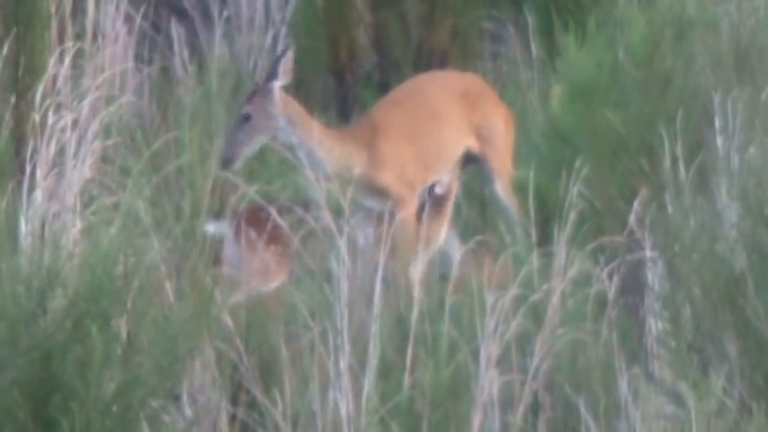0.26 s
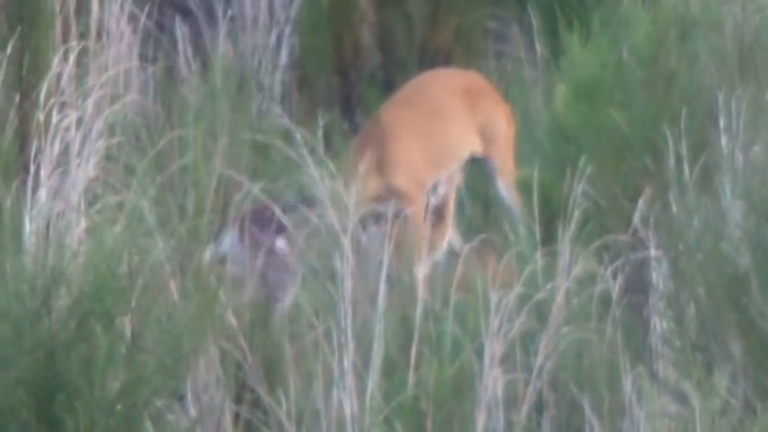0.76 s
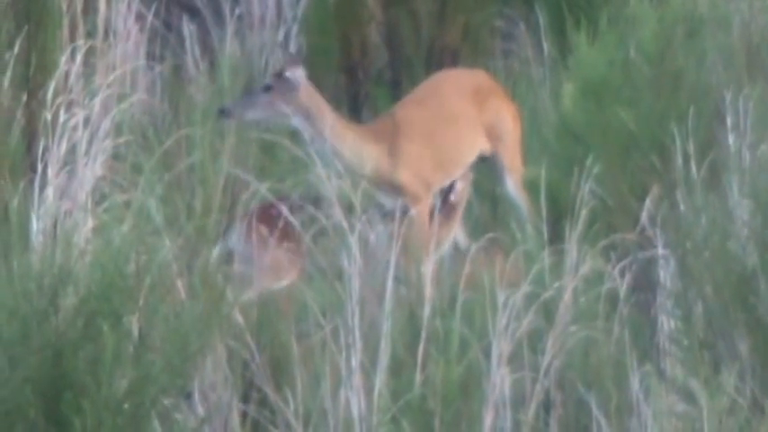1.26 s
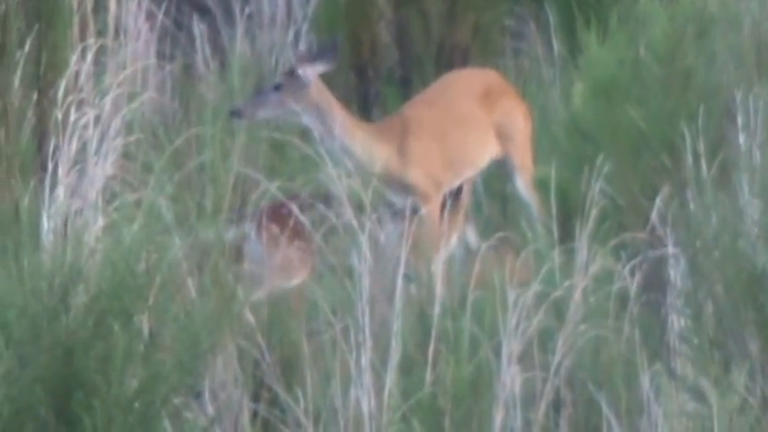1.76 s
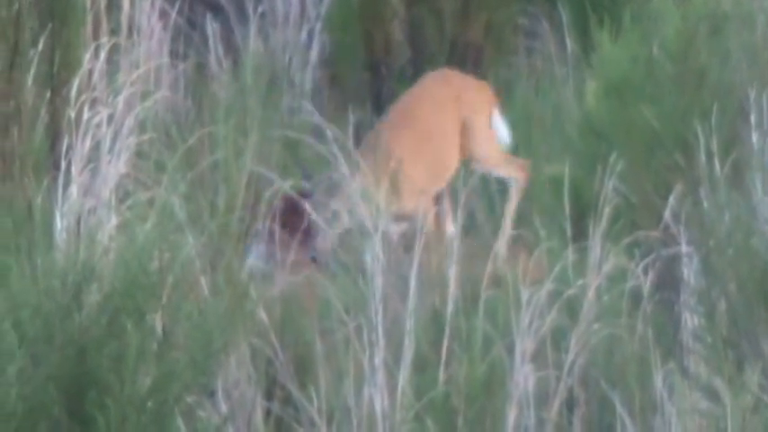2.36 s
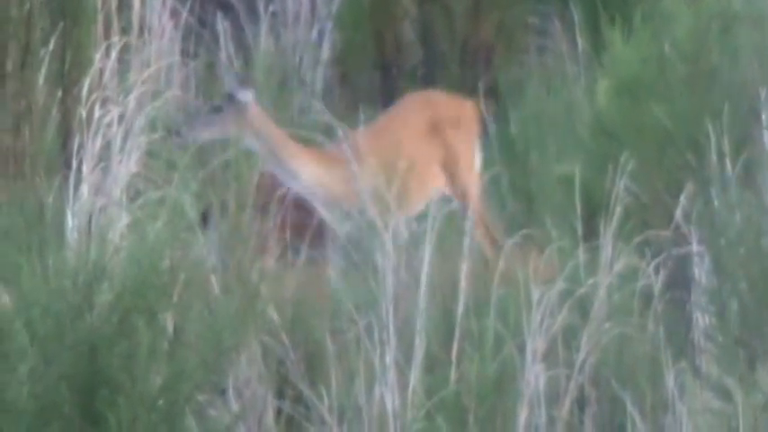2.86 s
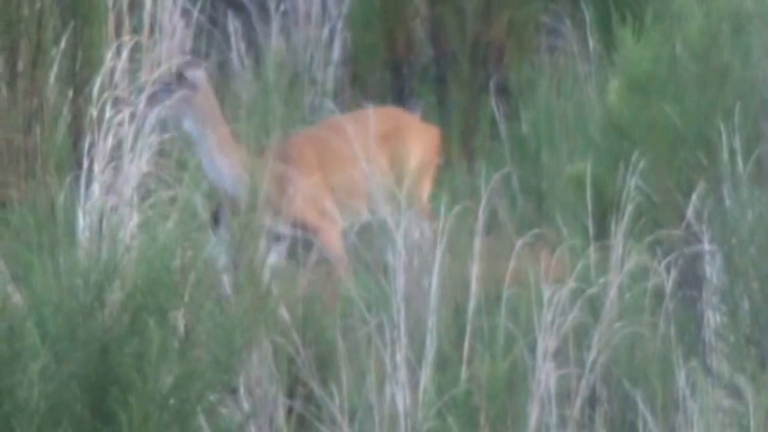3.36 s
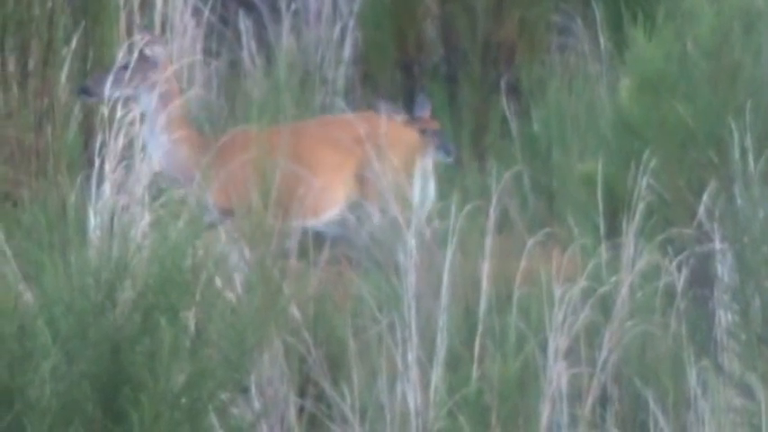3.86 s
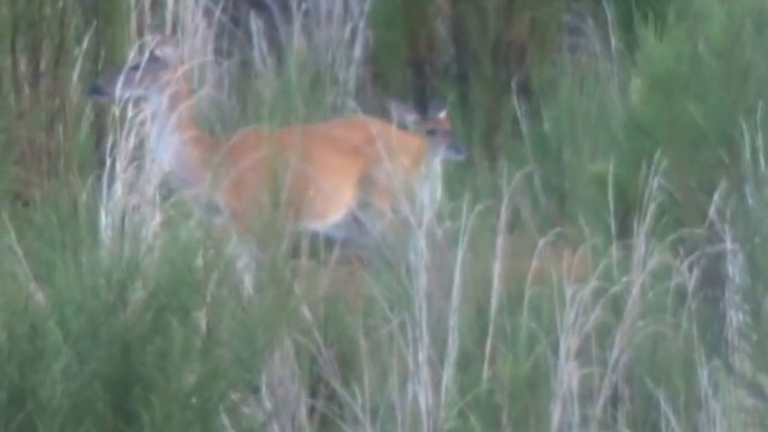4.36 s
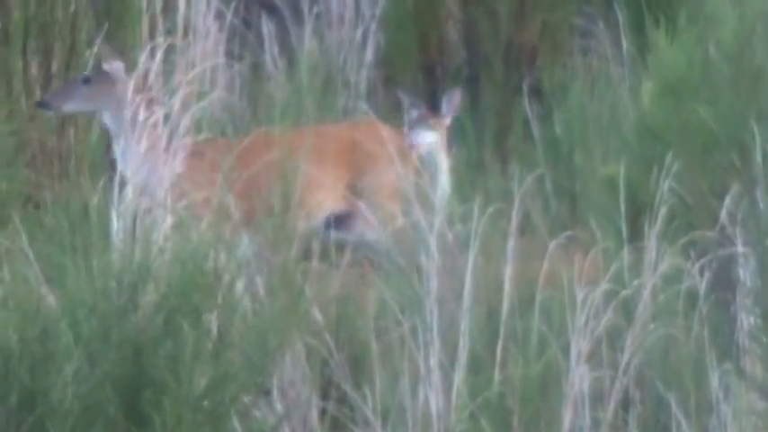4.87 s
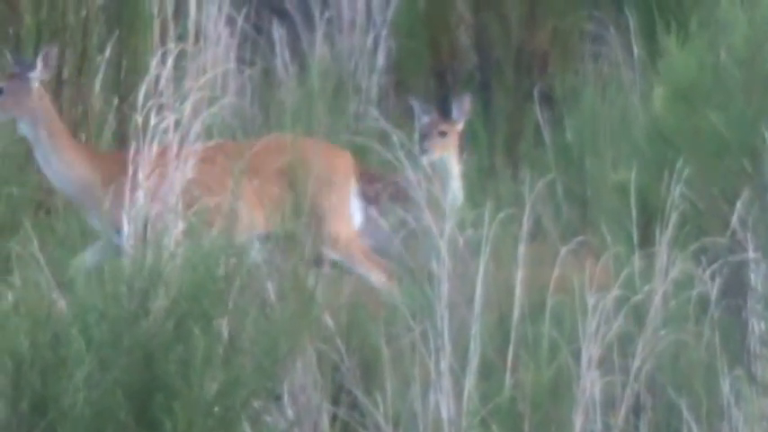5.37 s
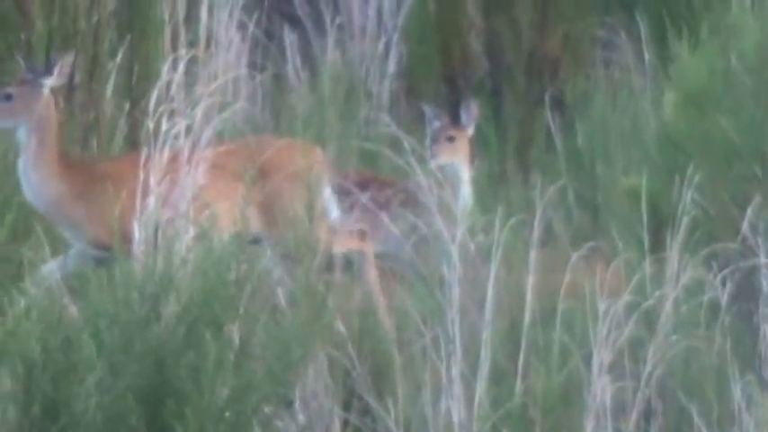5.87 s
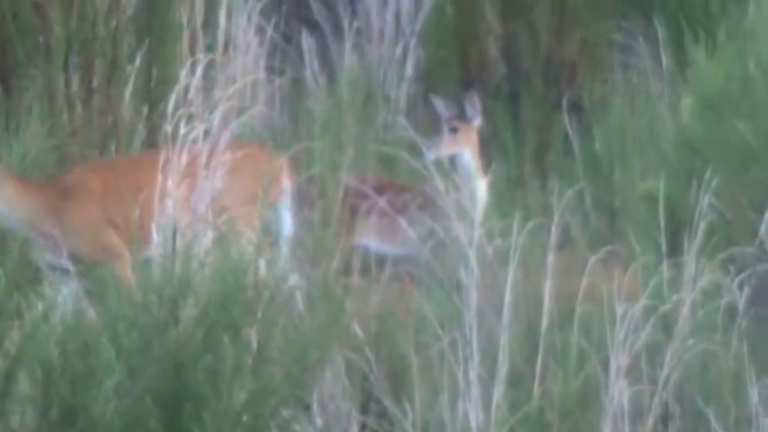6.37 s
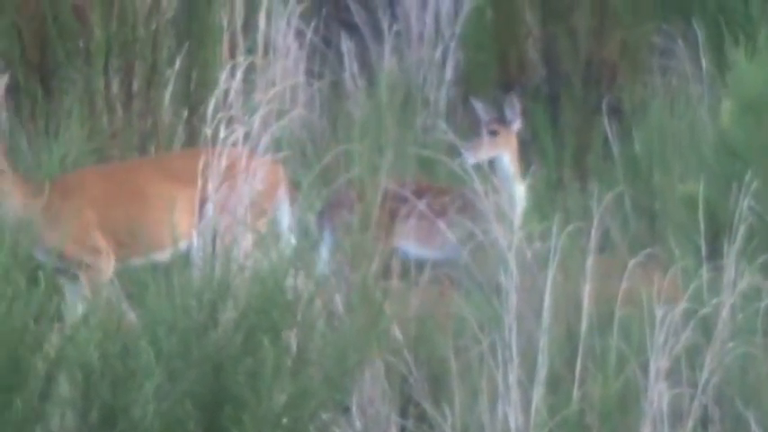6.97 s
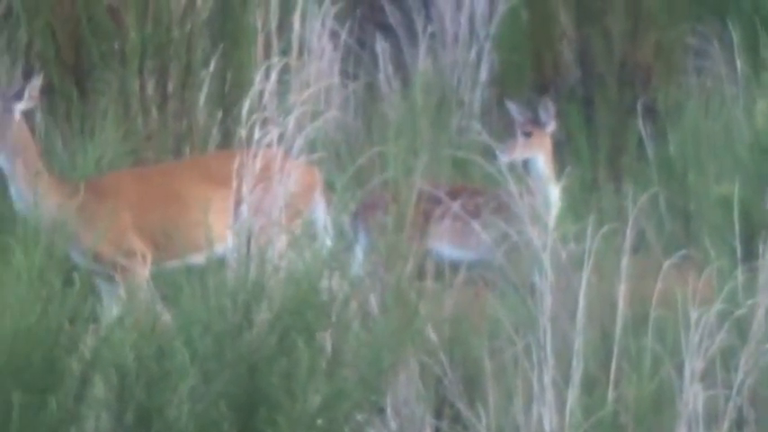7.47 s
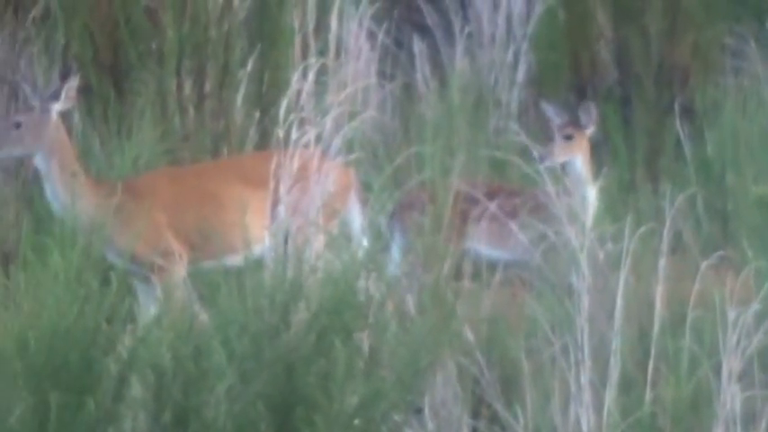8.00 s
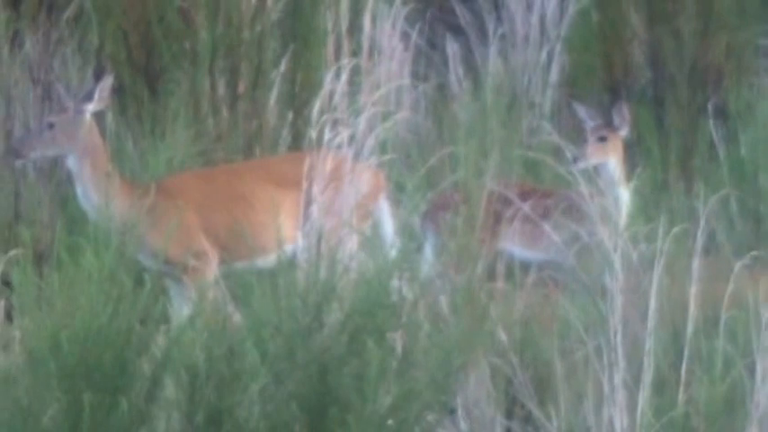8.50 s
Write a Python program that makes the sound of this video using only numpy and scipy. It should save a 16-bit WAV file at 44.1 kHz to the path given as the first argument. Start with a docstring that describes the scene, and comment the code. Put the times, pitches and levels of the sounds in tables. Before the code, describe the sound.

Insects drone high and steady over an open field while crows caw far off, with dull handling bumps and faint lens motor whirs close by.

```python
"""Insects drone high and steady over a field: shaped noise, pulsed by their wing strokes.
Crows caw far off as throbbing harmonics; a cricket and a small bird sound short tones that the trees return.
Air and traffic are filtered noise. A deer steps through dry grass in two crackling swishes of noise.
The handheld camera adds bumps, grip rumble and a knock; its lens motor clicks, whirs in steps and whines.
The camera's faint line-scan whistle lies on top."""
import sys
import numpy as np
from scipy import signal
from scipy.fft import rfft, irfft, next_fast_len
from scipy.io import wavfile

SR = 44100
rng = np.random.default_rng(int(sys.argv[2]) if len(sys.argv) > 2 else 0)


def dump(signal):
    """Clip the signal to [-1, 1] and save it as 16-bit WAV at the path in sys.argv[1]."""
    limited = np.clip(np.atleast_2d(signal).T, -1, 1)
    pcm = np.round(limited * 32767).astype(np.int16)
    wavfile.write(sys.argv[1], SR, pcm)


N = 385434
TIME = np.arange(N) / SR

# Colours give only the shape of a spectrum: their noise is scaled to rms 1.
# colour of the lower insect chorus: (frequency [Hz], relative level [dB per Hz])
LOW_CHORUS_COLOUR = [(6200, -34), (6600, -22), (7000, -11), (7350, -6), (7600, -1.5), (7800, 0), (7980, -2),
                     (8250, -5.5), (8440, -3.5), (8650, -11), (9200, -24)]
# colour of the higher insect chorus: (frequency [Hz], relative level [dB per Hz])
HIGH_CHORUS_COLOUR = [(8300, -28), (8700, -15), (9050, -8.5), (9400, -4.5), (9700, -.5), (10170, .5),
                      (10310, -4), (10400, -2), (10700, -10), (10800, -6.5), (10920, -12), (11020, -23),
                      (11400, -40)]
# wing resonance of the nearest insect: (frequency [Hz], relative level [dB per Hz])
NEAR_SINGER_COLOUR = [(7200, -24), (7600, -9), (7780, 0), (7960, -1), (8150, -11), (8500, -26)]
# colour of open air and microphone hiss: (frequency [Hz], relative level [dB per Hz])
AIR_COLOUR = [(20, 1), (70, -11), (130, -4), (200, -1.5), (330, -4.5), (470, -4), (650, -5), (1050, -8.5),
              (1700, -13), (2600, -15), (4400, -15), (5700, -17.5), (11500, -23), (15700, -24)]
# how alike the two microphone ports hear noise: (frequency [Hz], left-right likeness [-1 to 1])
PORT_LIKENESS = [(60, 0.84), (300, 0.98), (700, 0.36), (1400, 0.068), (3000, 0.32), (6000, 0.11),
                 (7500, 0.57), (10500, 0.75), (11500, 0.93), (16000, .98)]
# how far the left port leads the right: (frequency [Hz], phase lead [rad])
PORT_LEAD = [(60, 0), (700, -.3), (1400, .5), (2200, 2.6), (3600, 4), (4400, 6), (7400, 7.1), (10000, 6.4),
             (11300, 6.28)]
# colour of the distant traffic hum: (frequency [Hz], relative level [dB per Hz])
TRAFFIC_COLOUR = [(100, -31), (140, -7.5), (175, -3), (195, 2.5), (225, -14), (265, -3.5), (330, -30)]
# far vehicles passing: (start [s], end [s], level of the added hum [dB])
VEHICLE_PASSES = [(2.5, 3.35, -63), (5.1, 6.45, -64.5), (6.8, 7.45, -69.5)]
PASS_RISE_S, PASS_FALL_S = 0.14, 0.12
# colour of the grip's rumble: (frequency [Hz], relative level [dB per Hz])
RUMBLE_COLOUR = [(12, -12), (30, -0.5), (55, 1), (100, -6), (170, -15), (300, -30.5), (700, -74)]
# shifts of the hand on the camera: (start [s], end [s], level before trim [dB])
HAND_SHIFTS = [(.17, .62, -46), (.7, .84, -42), (.98, 1.32, -43), (1.47, 1.51, -43), (1.62, 1.86, -42.5),
               (1.94, 2.09, -47), (2.22, 2.6, -53), (2.93, 3.07, -56), (3.29, 3.44, -55),
               (3.99, 4.1, -47.5), (4.66, 4.72, -51), (8.3, 8.4, -60.5)]
SHIFT_RISE_S, SHIFT_FALL_S = 0.019, 0.026
# bumps on the camera body: (centre time [s], level before trim [dB], pitch [Hz])
BODY_BUMPS = [(.225, -27.5, 104), (.28, -25, 106), (.3, -28.5, 55.5), (0.425, -36.5, 105), (.523, -29, 81),
              (.78, -35, 96), (.838, -28.5, 95), (1.05, -23.5, 122), (1.071, -28, 54.7),
              (1.118, -25.5, 156), (1.149, -31, 64.6), (1.218, -26.5, 129), (1.238, -36, 77.6),
              (1.617, -37.5, 68.4), (1.837, -29.5, 88.5), (1.984, -36, 94), (2.045, -32, 97),
              (2.083, -28.5, 85), (3.301, -41, 52), (3.342, -42, 60), (4.067, -40, 84), (8.35, -50.5, 52)]
# runs of the lens motor: (start [s], end [s], level of the whir's drive [dB])
MOTOR_RUNS = [(1.001, 1.902, -65), (2.47, 3.437, -65.5), (5.089, 6.54, -67), (8.46, 8.9, -66)]
# colour of the lens barrel: (frequency [Hz], relative level [dB per Hz])
BARREL_COLOUR = [(1200, -13), (2050, -2), (2380, 7), (2650, -10.5), (3300, 5), (3700, -24), (4500, 6),
                 (5300, -18), (6200, 1.5), (8000, -48)]
# colour of the motor's tick: (frequency [Hz], relative level [dB per Hz])
TICK_COLOUR = [(3000, -20), (3900, -3), (4400, 0), (4800, -4), (5600, -18)]
# thin tones of the motor's whine: (pitch [Hz], rms level [dB])
WHINE_TONES = [(4640, -78), (4860, -78), (5020, -82), (5150, -76), (5460, -81)]
WHINE_START_S, WHINE_END_S = 6.9, 8.1
# pictures a second, which pace the motor's steps
FIELD_HZ = 59.94
# far bird's rising whistle: (start [s], length [s], first pitch [Hz], last pitch [Hz])
BIRD_WHISTLE = (.78, .39, 3020, 3660)
# clear caws: (time of the arch's top [s], top pitch [Hz], length [s], level before trim [dB],
# pitch drop at the ends [share])
CLEAR_CAWS = [(0.854, 736, .14, -55, 0.22), (1.881, 722, .13, -54, 0.22), (2.0, 746, 0.099, -64.5, 0.089),
              (2.298, 750, 0.11, -63.5, 0.14), (2.597, 765, .085, -58.5, 0.16),
              (3.06, 694, 0.12, -65, 0.08), (3.605, 735, 0.12, -64, 0.2), (3.75, 665, .14, -65, .14),
              (4.052, 752, 0.12, -58.5, 0.24), (4.258, 692, 0.12, -63.5, .18),
              (5.191, 638, 0.12, -52.5, 0.09), (5.819, 684, 0.14, -52, 0.16),
              (6.311, 668, .135, -52.5, 0.124), (6.822, 668, 0.14, -50.5, 0.15),
              (7.161, 669, 0.12, -53, 0.21), (7.563, 693, .09, -63, .08), (7.87, 657, .12, -55.5, .23),
              (8.24, 658, .13, -56.5, .23)]
CAW_RISE = .38  # share of its length for which a caw climbs
# hoarse sinking rasps: (start [s], length [s], first pitch [Hz], level before trim [dB])
HOARSE_RASPS = [(3.108, 0.3, 860, -64), (3.822, 0.13, 880, -64.5), (4.336, .18, 820, -61.5),
                (5.251, 0.33, 870, -61), (5.91, .12, 850, -62.5), (6.868, .18, 900, -62.5)]
RASP_SINK, RASP_ROUGH = .14, 0.906  # share by which the pitch sinks; roughness (0-1)
# a crow's throat as heard across the field: (frequency [Hz], relative level [dB])
CROW_THROAT = [(500, -41), (660, -16), (735, -6.5), (1000, -36), (1200, -5), (1320, 1.5), (1480, 0.5),
               (1650, -3.5), (1950, -14), (2200, -23), (3000, -38)]
# the crows grow excited between these times (s); each voice is (roughness 0-1, brightness dB)
EXCITED_S, CALM, EXCITED = (5, 7.2), (.17, -6.5), (0.47, -0.89)
# clicks that start and stop a run: (level before trim [dB], ring pitch [Hz])
START_CLICK = (-45, 2240)
STOP_CLICK = (-45, 1990)
# colour of a click's snap: (frequency [Hz], relative level [dB per Hz])
SNAP_COLOUR = [(1400, -13), (3400, -10), (4600, 10.5), (5300, 5), (6300, 11), (9000, -31), (14000, -24)]
# chirps of one far cricket: (start [s], level before stroke trim [dB])
CRICKET_CHIRPS = [(2.62, -70), (3.57, -76), (4.085, -73), (4.675, -72), (5.19, -67), (5.685, -68),
                  (6.2, -67)]
# three wing strokes make a chirp; STROKE_DB trims each of them
CRICKET_HZ, STROKE_GAP_S, STROKE_S, STROKE_DB = 4300, .054, 0.025, (-3, 5, 2)
# swishes of dry grass: (peak time [s], level before crackle [dB], rise [s], decay [s])
GRASS_SWISHES = [(2.755, -52, .04, .03), (3.05, -51.5, 0.042, 0.12)]
# colour of dry grass: (frequency [Hz], relative level [dB per Hz])
GRASS_COLOUR = [(200, -3), (700, -3), (1500, 0), (2800, 2), (4200, -2), (6200, -6), (9000, -10),
                (14000, -25)]
# a light knock on the camera: (time [s], starting level [dB], decay [s])
LIGHT_KNOCK = (7.202, -47.5, 0.0078)
# colour of the knock: (frequency [Hz], relative level [dB per Hz])
KNOCK_NOISE_COLOUR = [(150, -10), (450, 0), (1150, -1), (1700, -9), (4000, -13), (8000, -30)]


def gain_of(db):
    """Decibels to amplitude."""
    return 10 ** (np.asarray(db) / 20)


def evened(x):
    """Scales to rms 1."""
    return x / np.sqrt(np.mean(abs(x) ** 2) + 1e-20)


def read(points, hz):
    """Reads a frequency table joined by straight lines over log frequency."""
    f, value = np.transpose(points)
    return np.interp(np.log(hz + 1), np.log(f + 1), value)


def add(mix, s, sound):
    """Mixes a sound in from time s."""
    part = mix[max(round(s * SR), 0):][:len(sound)]
    part += sound[:len(part)]


def wander(rate, size=N):
    """Random drift of rms 1 that heads for a new value rate times a second."""
    knots = rng.standard_normal(8192)
    return evened(np.interp(np.arange(size) / SR * rate, np.arange(len(knots)), knots))


def noise(colour):
    """Stereo noise of rms 1 with the given spectrum, as the two ports pick it up."""
    size = next_fast_len(N)
    hz = np.fft.rfftfreq(size, 1 / SR)
    left, other = rfft(rng.standard_normal((2, size)))
    same = np.clip(read(PORT_LIKENESS, hz), -1, 1)
    right = same * left + np.sqrt(1 - same ** 2) * other
    pair = np.array([left, right * np.exp(-1j * read(PORT_LEAD, hz))])
    inside = (hz > colour[0][0]) & (hz < colour[-1][0])
    return evened(irfft(pair * gain_of(read(colour, hz)) * inside, size)[:, :N])


def swells(rows, rise_s, fall_s):
    """Amplitude that grows into each (start, end, dB) row, holds and dies away."""
    total = np.zeros(N)
    for start, end, db in rows:
        slope = np.minimum((TIME - start) / rise_s, (end - TIME) / fall_s)
        total += gain_of(db) * np.exp(np.minimum(slope, 0))
    return total


def field_echo(x, t60=1.0):
    """Sparse, scattered returns from the trees, different at each port, sink by 60 dB in t60 seconds."""
    t = TIME[:SR]
    hits = rng.random((2, SR)) < .05
    taps = rng.standard_normal((2, SR)) * hits * gain_of(-60 * t / t60)
    return signal.fftconvolve(x[None], evened(taps) / np.sqrt(SR), axes=1)[:, :N]


def reflected(x, echo_db, count=14):
    """Ground and stems return a sound within a few hundredths of a second, rippling its spectrum."""
    out = x.copy()
    for delay, sign in zip(rng.uniform(.002, .02, count), rng.choice([-1, 1], count)):
        out += sign * gain_of(echo_db) / np.sqrt(count) * np.roll(x, round(delay * SR), axis=-1)
    return evened(out)


def strokes(rate_hz, jitter, length, steady):
    """Envelope of repeated strokes, each swelling for a share of the cycle, over a steady part."""
    turns = np.cumsum(rate_hz * (1 + jitter * wander(3.6))) / SR
    return evened(steady + np.exp(-(2 * (turns % 1 - .5) / length) ** 2))


def insects(low_db=-49.0, high_db=-44.0, near_db=-53.5, flutter_db=0.23, stems_db=-12):
    """Two choruses scrape their wings; the nearest insect pulses with a strong and a weak stroke in turn."""
    low = strokes(77, .03, .4, 2.2) * gain_of(low_db + flutter_db * wander(40))
    low = low * reflected(noise(LOW_CHORUS_COLOUR), stems_db)
    high = strokes(67.5, .003, .3, 4.5) * gain_of(high_db + flutter_db * wander(40))
    high = high * reflected(noise(HIGH_CHORUS_COLOUR), stems_db)
    beat = 2 * np.pi * 27.3 * TIME + .12 * wander(3)  # two strokes a cycle
    pulses = evened((.15 + np.cos(beat) ** 4) * (1 + .18 * np.cos(beat)))
    near = pulses * gain_of(near_db) * noise(NEAR_SINGER_COLOUR)
    # left and right trims in dB
    return (low + near) * gain_of([[.8], [-.8]]) + high * gain_of([[-.3], [.3]])


def air(air_db=-54.5, roar_db=-9, waver_db=1.0, fade_db_per_s=0.12):
    """The soft roar of open country swells with each far vehicle; the microphone's hiss lies on top."""
    passing = swells(VEHICLE_PASSES, PASS_RISE_S, PASS_FALL_S)
    swell = 1 + gain_of(roar_db) * (passing / passing.max()) ** 2
    swell = swell * gain_of(waver_db * wander(8) - fade_db_per_s * TIME)
    wash = noise(AIR_COLOUR)
    roar = signal.sosfiltfilt(signal.butter(2, 1500, fs=SR, output="sos"), wash)
    return gain_of(air_db) * (wash + roar * (swell - 1))  # only the low part moves


def traffic(steady_db=-69):
    """Far engines and tyres, of which only a dull hum arrives."""
    level = gain_of(steady_db) + swells(VEHICLE_PASSES, PASS_RISE_S, PASS_FALL_S)
    return level * noise(TRAFFIC_COLOUR)


def grip_rumble(rest_db=-77, tremor_db=5, uneven_db=2):
    """A hand that rests or shifts on the body rubs out a low, uneven rumble."""
    shifting = swells(HAND_SHIFTS, SHIFT_RISE_S, SHIFT_FALL_S) * gain_of(uneven_db * wander(25) - 2.0)
    resting = gain_of(rest_db + tremor_db * wander(9))
    return (shifting + resting) * noise(RUMBLE_COLOUR) * gain_of([[-.5], [.5]])


def lens_motor(creep_db=-71, tock_db=12, tock_hz=2330, tick_db=10):
    """The motor steps once a picture; every fourth step tocks in the barrel and the next one ticks."""
    running = gain_of(creep_db) * (TIME < MOTOR_RUNS[0][0])  # it creeps quietly before the first run
    for start, end, db in MOTOR_RUNS:
        running = running + gain_of(db) * (TIME > start) * (TIME < end)
    step = (TIME - .001) * FIELD_HZ
    # each step dies away with a 4 ms time constant
    every, tick_step, tock_step = (np.exp(-since / FIELD_HZ / .004)
                                   for since in (step % 1, step % 4, (step + 1) % 4))
    whir = evened(1.2 + every) * noise(BARREL_COLOUR) * gain_of([[-1], [1]])
    tick = gain_of(tick_db) * tick_step * noise(TICK_COLOUR)
    turn = 2 * np.pi * np.cumsum(tock_hz * (1 + 0.028 * wander(200))) / SR
    # the tock takes half the ports' phase lead
    tock = gain_of(tock_db) * tock_step * np.sin([turn, turn - read(PORT_LEAD, tock_hz) / 2])
    return running * (whir + tick + tock)


def body_bumps(cycles=0.52, bump_db=1.1, rock_s=.00085):
    """A bump makes the camera body swing for a dull low cycle or two."""
    out, t = np.zeros((2, N)), np.arange(-SR // 20, SR // 20) / SR
    lags = rock_s * rng.normal(1, .4, len(BODY_BUMPS))
    for (s, db, hz), lag in zip(BODY_BUMPS, lags):
        bump = -gain_of(db + bump_db) * np.exp(-(t * hz / cycles) ** 2) * np.sin(2 * np.pi * hz * t)
        for port, side in enumerate([1, -1]):  # the body rocks, so the two ports move out of step
            add(out[port], s + t[0] + side * lag, bump)
    return out * gain_of([[-.5], [.5]])


def songbird(whistle_db=-69.5, echo_db=-6, fading_db=2.0):
    """One thin upward slur from the trees that levels off, fading in and out on the way."""
    s, length, first_hz, last_hz = BIRD_WHISTLE
    u = np.arange(0, length, 1 / SR) / length
    hz = last_hz + (first_hz - last_hz) * abs(1 - u) ** 1.3
    level = gain_of(whistle_db + fading_db * wander(45, size=len(u))) * abs(np.sin(np.pi * u)) ** 0.27
    tone = np.zeros(N)
    add(tone, s, level * np.sin(2 * np.pi * np.cumsum(hz) / SR))
    return tone + gain_of(echo_db) * field_echo(tone)


def crow_voice(hz, rough, bright_db, jitter=0.073, throb_hz=58):
    """A jittering, throbbing pitch carries its harmonics through the throat's resonance."""
    t = np.arange(len(hz)) / SR
    hz = hz * (1 + jitter * rough * wander(249.7, size=len(t)))
    phase = 2 * np.pi * np.cumsum(hz) / SR
    voice = np.zeros(len(t))
    for k in range(1, 5):
        level_db = read(CROW_THROAT, k * hz) + bright_db * (k > 2)  # brightness trims the upper two
        voice += gain_of(level_db) * np.sin(k * phase)
    throb = 1 + .55 * np.sin(2 * np.pi * throb_hz * t + wander(40, size=len(t)))
    return evened(voice * throb)


def crows(direct_db=-1, echo_db=-4.0):
    """Caws arch in pitch, rougher and brighter with excitement; rasps slide down; the trees return both."""
    out = np.zeros(N)
    for s, top_hz, length, db, drop in CLEAR_CAWS:
        rise, fall = CAW_RISE * length, (1 - CAW_RISE) * length
        t = np.arange(-rise, fall, 1 / SR)
        arch = abs(np.where(t < 0, t / rise, t / fall))  # 0 at the top, 1 at the ends
        rough, bright_db = (np.interp(s, EXCITED_S, ends) for ends in zip(CALM, EXCITED))
        voice = crow_voice(top_hz * (1 - drop * arch ** 1.5), rough, bright_db)
        add(out, s - rise, gain_of(db) * voice * np.clip(1 - arch ** 2, 0, 1) ** 0.43)
    for s, length, first_hz, db in HOARSE_RASPS:
        u = np.arange(0, length, 1 / SR) / length
        voice = crow_voice(first_hz * (1 - RASP_SINK * u), RASP_ROUGH, CALM[1])
        add(out, s, gain_of(db) * voice * abs(np.sin(np.pi * u)) ** .5)
    return gain_of(direct_db) * out + gain_of(echo_db) * field_echo(out)


def lens_clicks(snap_decay_s=0.0024, ring_decay_s=0.0056, ring_lag_s=0.0012, ring_db=1, ring_width_hz=260):
    """At each end of a run a bright snap, then the barrel rings a moment later."""
    snap = noise(SNAP_COLOUR)
    out, t = np.zeros((2, N)), TIME[:SR // 20]
    clicks = []
    for start, end, _ in MOTOR_RUNS:
        clicks += [(start, *START_CLICK), (end, *STOP_CLICK)]
    for k, (s, db, hz) in enumerate(clicks):
        resonance = signal.iirpeak(hz, hz / ring_width_hz, SR)
        ring = evened(signal.lfilter(*resonance, rng.standard_normal((2, len(t)))))
        ring = gain_of(db + ring_db) * ring * np.exp(-t / ring_decay_s)
        for port in range(2):
            grain = snap[port, k * len(t):][:len(t)]  # a fresh stretch of noise for each click
            add(out[port], s, gain_of(db) * np.exp(-t / snap_decay_s) * grain)
            add(out[port], s + ring_lag_s, ring[port])
    return out


def cricket(echo_db=-8):
    """Each wing stroke is a short, nearly pure tone, and the trees return it."""
    out, t = np.zeros(N), np.arange(0, STROKE_S, 1 / SR)
    stroke = np.sin(np.pi * t / STROKE_S) * np.sin(2 * np.pi * CRICKET_HZ * t)
    for s, db in CRICKET_CHIRPS:
        for k, stroke_db in enumerate(STROKE_DB):
            add(out, s + k * STROKE_GAP_S, gain_of(db + stroke_db) * stroke)
    return out + gain_of(echo_db) * field_echo(out)


def grass(crackle_db=3):
    """Stems brush and crackle in a quick swell that dies away."""
    swell = np.zeros(N)
    for s, db, rise, decay in GRASS_SWISHES:
        swell += gain_of(db) * np.exp(np.minimum((TIME - s) / rise, (s - TIME) / decay))
    crackle = evened(gain_of(crackle_db * wander(400)))
    return swell * crackle * noise(GRASS_COLOUR)


def lens_whine():
    """A longer travel of the lens sings in a few thin, wavering tones."""
    tones = np.zeros(N)
    for hz, db in WHINE_TONES:
        phase = 2 * np.pi * np.cumsum(hz * (1 + .002 * wander(60))) / SR
        tones += gain_of(db) * evened(np.sin(phase))
    return tones * swells([(WHINE_START_S, WHINE_END_S, 0)], .12, .17)


def knock():
    """A light knock on the camera is a burst of noise that dies at once."""
    s, db, decay = LIGHT_KNOCK
    return gain_of(db) * (TIME > s) * np.exp(-abs(TIME - s) / decay) * noise(KNOCK_NOISE_COLOUR)


def scene():
    """The field and the camera's own noises."""
    field = insects() + air() + traffic() + songbird() + crows() + cricket() + grass()
    camera = grip_rumble() + body_bumps() + knock() + lens_motor() + lens_clicks() + lens_whine()
    return field + camera


def record(dry, whistle_db=-79, scan_hz=15734, edge_hz=15830):
    """The camera adds the faint whistle of its line scan, then limits the band."""
    whistle = gain_of(whistle_db) * np.sin(2 * np.pi * scan_hz * TIME)
    lowpass = signal.firwin(1023, edge_hz, window=("kaiser", 9), fs=SR)
    return signal.oaconvolve(dry + whistle, lowpass[None], "same")


dry = scene()
out = record(dry)
dump(out)
```